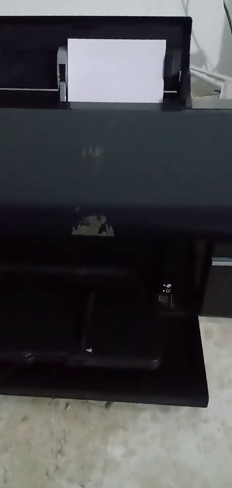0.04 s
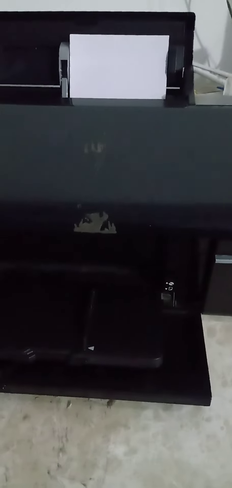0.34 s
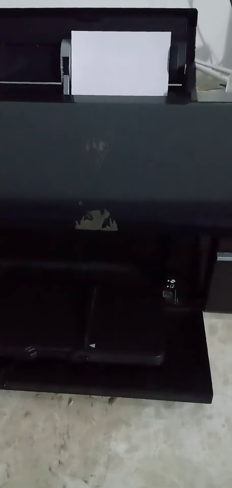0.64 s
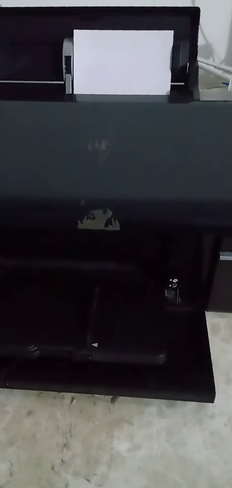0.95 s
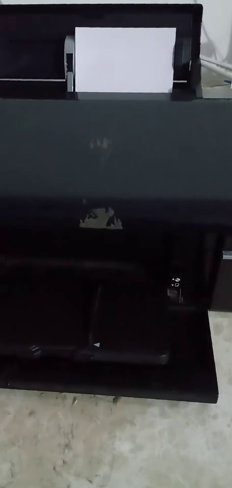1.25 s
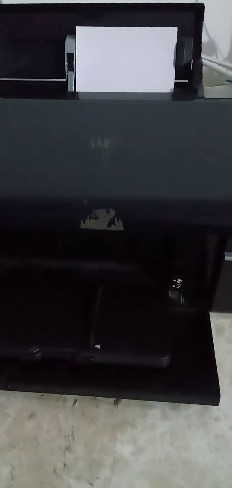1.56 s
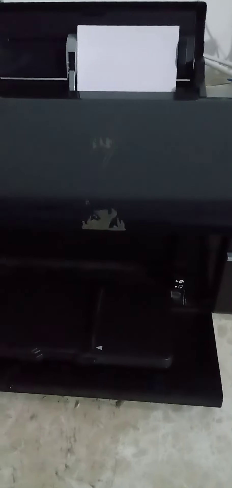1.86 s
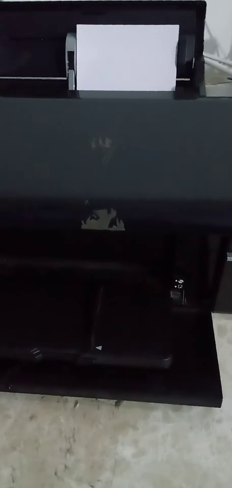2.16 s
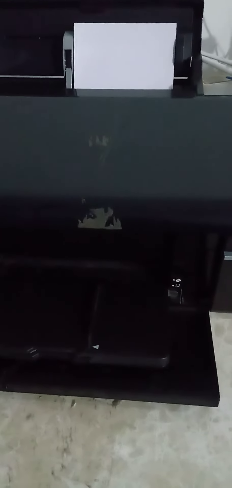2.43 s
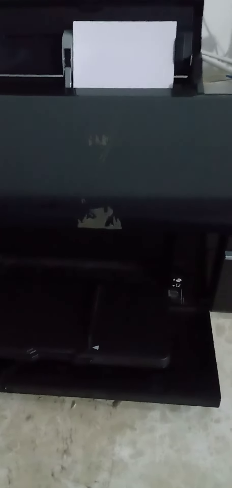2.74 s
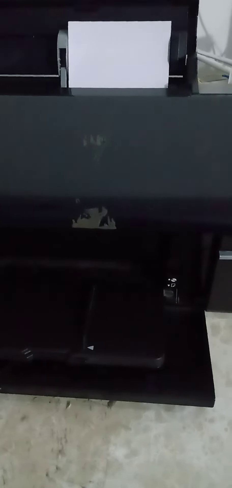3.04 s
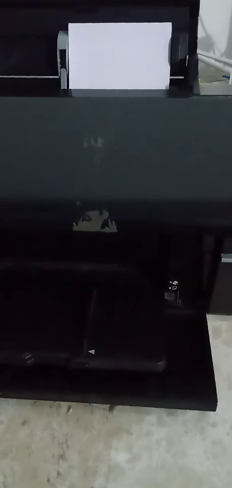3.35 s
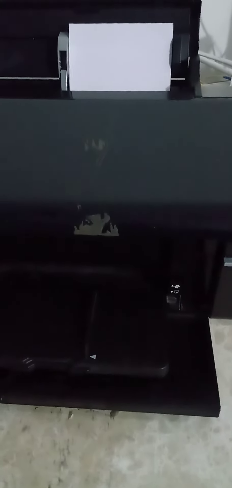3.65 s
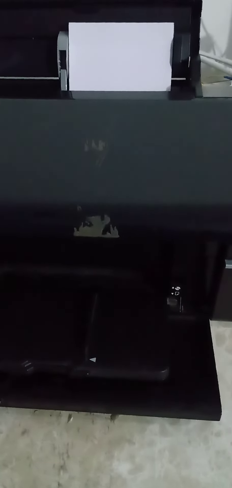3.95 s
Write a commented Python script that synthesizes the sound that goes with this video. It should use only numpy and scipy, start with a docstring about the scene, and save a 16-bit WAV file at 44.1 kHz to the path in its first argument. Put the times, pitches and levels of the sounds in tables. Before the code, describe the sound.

An inkjet printer clicks, clunks and whirs as it draws in a sheet of card.

```python
"""An inkjet printer takes in a sheet of card in a bare, ringing room, over its idle hum.
First the drive takes up its slack with a clack; the carriage makes a short run and parks (0.7-1.3 s).
Latches drop in and a ratchet rasps; each impact sets the plastic case ringing. From 2.3 s the rollers
creep. At 3 s the feed gears engage: tooth contacts force the case to whir, the motor whines and the
card hisses by friction as it is drawn in amid clicks and knocks. Last, a roller squeals as it stops."""
import sys
import numpy as np
from scipy import signal
from scipy.fft import rfft, irfft
from scipy.io import wavfile
from scipy.ndimage import uniform_filter1d

SR = 44100
rng = np.random.default_rng(int(sys.argv[2]) if len(sys.argv) > 2 else 0)


def inscribe(sig):
    """Save sig as 16-bit PCM at rate SR to the path in sys.argv[1].

    A 1-D sig is mono; a 2-D sig holds one channel per row.
    Samples are clipped to [-1, 1] before scaling.
    """
    pcm = np.round(np.clip(np.atleast_2d(sig).T, -1, 1) * 32767)
    wavfile.write(sys.argv[1], SR, pcm.astype(np.int16))


N = 176400
T = np.arange(N) / SR

# effort of each drive (time [s], level [dB])
CARRIAGE_EFFORT = [(.743, -77.5), (.748, -54.5), (.9, -52.5), (1.0, -53), (1.1, -51.5), (1.18, -49),
                   (1.21, -56), (1.3, -76)]
RATCHET_EFFORT = [(1.525, -83), (1.55, -44.5), (1.6, -51.5), (1.66, -54.5), (1.70, -62.5), (1.9, -78.5)]
CREEP_EFFORT = [(2.3, -92), (2.37, -77.5), (2.6, -72), (2.62, -66), (2.71, -65), (2.78, -59.5), (2.86, -60),
                (3.0, -69.5), (3.05, -76)]
FEED_EFFORT = [(3.0, -63), (3.03, -46), (3.072, -58.5), (3.09, -38), (3.15, -44.5), (3.22, -41.5),
               (3.3, -46), (3.4, -50), (3.55, -50), (3.61, -46.5), (3.66, -47.5), (3.73, -51),
               (3.76, -40.5), (3.81, -43.5), (3.88, -42.5), (3.95, -48), (4.0, -53)]
# spectrum of each drive (frequency [Hz], level [dB])
CARRIAGE_SPECTRUM = [(60, -17), (125, -7.5), (189, -11), (227, -3), (465, 1), (582, -3.5), (971, -7),
                     (1690, -12.5), (2340, -10), (8000, -27.5), (10400, -73)]
RATCHET_SPECTRUM = [(145, -24), (231, 0.5), (388, -4), (998, -5), (1310, -6.5), (3920, -10), (8000, -27),
                    (10400, -68)]
CREEP_SPECTRUM = [(50, -20), (139, 1.5), (203, -10.5), (256, 0), (475, -15.5), (528, -2.5), (575, -7),
                  (1560, -22), (6890, -39.5), (8000, -32.5), (10400, -66)]
FEED_SPECTRUM = [(50, -22.5), (212, -4.5), (446, -10), (639, -5), (1090, -13.5), (1260, -8), (1370, -15),
                 (2600, -15), (7040, -32.5), (8000, -41), (10400, -72)]
def drives():
    """Transmission noise: the carriage belt runs more evenly than the ratchet, rollers and feed gears."""
    return (meshing(CARRIAGE_EFFORT, CARRIAGE_SPECTRUM, spread_db=1, flutter_db=1)
            + meshing(RATCHET_EFFORT, RATCHET_SPECTRUM)
            + meshing(CREEP_EFFORT, CREEP_SPECTRUM)
            + meshing(FEED_EFFORT, FEED_SPECTRUM))

def meshing(effort, spectrum, spread_db=1.5, flutter_db=2, teeth_per_s=520):
    """Forced vibration: uneven tooth contacts and sliding friction shake the case."""
    count = np.floor(np.cumsum(teeth_per_s * (1 + .08 * drift(60))) / SR)
    strength = from_db(spread_db * np.clip(rng.standard_normal(N), -2, 2))
    teeth = np.diff(count, prepend=0) * strength * rng.choice([-1, 1], N)
    friction = .88 * rng.standard_normal(N)
    envelope = level(effort) * from_db(flutter_db * drift(50))
    return envelope * in_case(unit_power(teeth) + friction, at_hz(spectrum, bins(N)))

# pawls and gears snap (time [s], level [dB], tilt [dB/octave], T60 [s])
SNAPS = [(.207, -63, -5.5, 0.077), (.746, -55.5, 0, .05), (.883, -47.5, -1, 0.052),
         (.953, -47, -1.5, 0.066), (1.13, -53, 0.5, .12), (1.181, -46.5, -1, .07), (1.540, -41, 4.5, .08),
         (1.661, -45, -1, 0.065), (2.613, -62.5, -7, .08), (2.7694, -58.5, -4.5, 0.028),
         (2.905, -61.5, 4, .03), (3.021, -51, 0.5, .05), (3.040, -42.5, 2, .07), (3.097, -38.5, 2.5, .08),
         (3.170, -38, -1, .07), (3.187, -31.5, 0.5, .09), (3.201, -36.5, 4.5, .1), (3.624, -57, 4, .05),
         (3.652, -36, 1, 0.037), (3.750, -37.5, 0, .08), (3.833, -43, 4, .06), (3.850, -35, 2.5, .09),
         (3.879, -38, -0.5, .08), (3.887, -37.5, 2, .06), (3.924, -38.5, -1.5, .07),
         (3.967, -40, -1.5, .05)]
# sprung latches drop in (time [s], crack level [dB], tilt [dB/octave], crack T60 [s], ring level [dB])
LATCH_DROPS = [(1.384, -48.5, -3, .09, -45.5), (1.526, -38, 1.5, .08, -37.5),
               (3.006, -38.5, -1, 0.063, -40), (3.076, -37.5, -.5, 0.058, -30.5),
               (3.736, -31, 0, 0.06, -28)]
# a hard plastic contact before its tilt (frequency [Hz], level [dB])
CLICK_SPECTRUM = [(100, -21), (400, -5), (900, -0.5), (1600, -5), (2600, -2), (3300, -5), (4200, -6),
                  (6000, -9.5), (8000, -18.5)]
def clicks(after_t60=.28):
    """Impulse excitation: a brief contact gives a broadband crack and a weak after-ring of the case."""
    out, hz = np.zeros(N), bins(SR)
    after_ring = from_db(-18 - 60 * T[:SR] / after_t60)
    for start, db, tilt, t60, *_ in SNAPS + LATCH_DROPS:
        ring = dense_modes(at_hz(CLICK_SPECTRUM, hz) + tilt * np.log2(np.maximum(hz, 300)))
        add(out, start, from_db(db) * ring * (decay(t60) + after_ring))
    return out

# modes of a latch spring (frequency [Hz], level [dB])
SPRING_MODES = [(2400, -6), (2615, 0), (2790, -7), (4090, -12), (4440, -11)]
def latch_rings(attack_s=.0013, t60=.06, detune=.004):
    """Free vibration: each latch rings briefly at the natural frequencies of its spring."""
    out, t = np.zeros(N), T[:SR]
    envelope = np.minimum(t / attack_s, 1) * from_db(-60 * t / t60)
    for start, *_, ring_db in LATCH_DROPS:
        ring = sum(from_db(db) * mode(hz * rng.normal(1, detune)) for hz, db in SPRING_MODES)
        add(out, start, from_db(ring_db) * unit_power(ring) * envelope)
    return out

# the chassis takes a load (time [s], level [dB], centre frequency [Hz], T60 [s])
CHASSIS_LOADS = [(.210, -54, 235.5, 0.24), (.436, -49, 498, 0.13), (.449, -46.5, 238, 0.15),
                 (.99, -47.5, 283, 0.18), (1.196, -42, 656, 0.083), (1.206, -48, 145, 0.25),
                 (1.527, -41, 591, 0.18), (1.538, -44, 341, 0.14), (1.664, -53.5, 447, 0.1),
                 (2.105, -66, 156.5, 0.22), (2.611, -57.5, 755, 0.16), (2.727, -59, 221, 0.24),
                 (2.769, -50.5, 652, 0.065), (3.008, -52, 644, 0.07), (3.032, -48, 280, 0.094),
                 (3.082, -41.5, 380, 0.1), (3.165, -38, 301, 0.15), (3.19, -37.5, 250, .2),
                 (3.586, -45, 330, 0.21), (3.655, -46.5, 328, 0.14), (3.745, -37.5, 328, 0.23),
                 (3.75, -47, 149.6, 0.22), (3.833, -45, 298, 0.13), (3.85, -36, 230, 0.11),
                 (3.8914, -31.5, 604, 0.048)]
def knocks(width_octaves=.55, skirt_db=-20.5):
    """Modal response: a soft, heavy contact excites one panel mode and the low chassis modes around it."""
    out = np.zeros(N)
    for start, db, centre_hz, t60 in CHASSIS_LOADS:
        octaves = np.log2(bins(SR) / centre_hz)
        band = np.exp(-.5 * (octaves / width_octaves) ** 2) + from_db(skirt_db) / (1 + octaves ** 2)
        ring = dense_modes(20 * np.log10(band)) + from_db(-6) * mode(centre_hz)
        add(out, start, from_db(db) * unit_power(ring) * decay(t60, attack_s=.0044))
    return out

# the hollow clack (frequency [Hz], level [dB])
CLACK_SPECTRUM = [(200, -24), (700, -12), (1300, 2), (1750, 0), (2300, 2), (2750, -6.5), (3200, -12),
                  (5500, -21), (7200, -18.5), (8200, -35)]
def clack(start=.4275):
    """Backlash: the drive takes up its slack in one impact."""
    out = np.zeros(N)
    ring = dense_modes(at_hz(CLACK_SPECTRUM, bins(SR)))
    add(out, start, from_db(-41) * ring * decay(t60=.1))
    return out

# the feed motor's whine (time [s], level [dB])
MOTOR_LEVEL = [(3.07, -90), (3.09, -55), (3.27, -51.5), (3.46, -50), (3.5, -54.5), (3.6, -46.5),
               (3.614, -60), (3.75, -73)]
# its harmonics (order, level [dB], throb depth [dB])
HARMONICS = [(1, -1.5, 0), (2, -.5, 2), (4, -16, 3), (7, -18.5, 6)]
def motor(hz=635.3, turns_per_s=6.2, peak_s=3.56):
    """Amplitude modulation: at a steady speed, the overtones throb as the load peaks once a roller turn."""
    load = np.cos(2 * np.pi * turns_per_s * (T - peak_s))
    return level(MOTOR_LEVEL) * sum(from_db(db + throb * load) * tone(k * hz) for k, db, throb in HARMONICS)

# gears and rollers under load, and the feed motor's swell near 610 Hz as it stops (start [s], end [s],
# frequency [Hz], level [dB])
GEAR_TONES = [(3.49, 3.66, 1809, -57.5), (3.51, 3.65, 1900, -61.5), (3.48, 3.58, 2540, -60),
              (3.6, 3.67, 610, -52), (3.617, 3.628, 4050, -58), (.76, 1.18, 2390, -63.5),
              (.77, 1.17, 955, -66)]
def gear_whines(attack_s=.012, t60=.22):
    """Driven oscillation: each part sings while loaded, then decays exponentially."""
    out = np.zeros(N)
    for start, end, hz, db in GEAR_TONES:
        gate = np.clip((T - start) / attack_s, 0, 1) * from_db(-60 * np.maximum(T - end, 0) / t60)
        out += gate * from_db(db) * tone(hz, wobble=.01, flutter_db=3.5)
    return out

# a stopping roller (time [s], frequency [Hz], level [dB])
ROLLER_GLIDE = [(3.79, 850, -62), (3.83, 843, -46.5), (3.925, 846, -50), (3.942, 845, -40.5),
                (3.958, 820, -39), (3.968, 780, -53), (4.0, 780, -66)]
def roller_squeal():
    """Frequency glide: the squeal droops as the roller stops."""
    times, hz, db = np.transpose(ROLLER_GLIDE)
    return level(np.c_[times, db]) * tone(np.interp(T, times, hz))

# the sliding card (time [s], level [dB]) and its spectrum (frequency [Hz], level [dB])
CARD_LEVEL = [(2.6, -86), (2.8, -70.5), (3.0, -73), (3.1, -59.5), (3.25, -53), (3.4, -62), (3.72, -72),
              (3.76, -55), (3.82, -62), (3.88, -48.5), (4.0, -60.5)]
CARD_SPECTRUM = [(500, -23.5), (2000, 1.5), (3500, -0.5), (5000, -2), (7000, 6), (8200, -13)]
def card_slide():
    """Friction noise: the card hisses over the rollers."""
    return level(CARD_LEVEL) * case_noise(CARD_SPECTRUM)

# resonances of the plastic case (frequency [Hz], bandwidth [Hz], lift [dB])
CASE_MODES = [(156, 15, 5), (223, 18, 5), (274.5, 22, 6), (383, 51, 3), (538, 18, 3.5), (783, 17, 1.5),
              (997, 24, 4.5), (1916, 66, 4), (2320, 120, 2.5), (4010, 84, 3.5)]
def in_case(x, spectrum_db):
    """Resonance: a vibration is coloured, lifted at each case mode and scaled to unit power."""
    hz = bins(len(x))
    lift = sum(db / (1 + (2 * (hz - centre) / width) ** 2) for centre, width, db in CASE_MODES)
    return unit_power(irfft(rfft(x) * from_db(spectrum_db + lift), len(x)))

# reverberation relative to the direct sound (frequency [Hz], level [dB])
ROOM_SPECTRUM = [(100, -6.5), (400, -6), (1000, -4.5), (2500, -4.5), (5000, -7), (8000, -12)]
def room(x, t60=.82, treble_t60=.65, split_hz=7200, gap_s=.0086, build_s=.015):
    """Diffuse reverberation: hard walls return a dense tail whose treble dies sooner."""
    t, hz = T[:SR], bins(SR)
    noise = rfft(rng.standard_normal(SR))
    low_share = 1 / (1 + (hz / split_hz) ** 6)
    low = irfft(noise * low_share) * from_db(-60 * t / t60)
    treble = irfft(noise * (1 - low_share)) * from_db(-60 * t / treble_t60)
    tail = rfft(np.clip((t - gap_s) / build_s, 0, 1) * (low + treble))
    even = tail / np.sqrt(uniform_filter1d(np.abs(tail) ** 2, size=20))  # no pitch stands out
    fade = np.cos(np.pi / 2 * t ** 2) ** 2
    response = irfft(even * from_db(at_hz(ROOM_SPECTRUM, hz))) * fade
    return signal.fftconvolve(x, response)[:N]

# idle hum and room noise (time [s], level [dB]) and their spectrum (frequency [Hz], level [dB])
IDLE_LEVEL = [(0, -68.5), (.4, -68.5), (1.5, -62.5), (2.3, -72.5), (4, -73.5)]
IDLE_SPECTRUM = [(45, -9), (110, 5), (230, -1), (550, -6), (800, -6.5), (1400, -14.5), (3800, -20),
                 (7500, -30.5)]
def idle_hum():
    """Noise floor: a low hum coloured by the case resonances."""
    return level(IDLE_LEVEL) * case_noise(IDLE_SPECTRUM)

def case_noise(spectrum):
    """Source and filter: white noise shaped by a spectrum and the case."""
    return in_case(rng.standard_normal(N), at_hz(spectrum, bins(N)))

def dense_modes(spectrum_db):
    """Modal overlap: crowded case modes merge into one second of level noise."""
    ring = in_case(rng.standard_normal(SR), spectrum_db)
    return ring / np.sqrt(uniform_filter1d(ring ** 2, size=600))

def decay(t60, attack_s=.0013):
    """Damping: a linear rise, then a fall of 60 dB every t60 seconds."""
    t = T[:SR]
    return np.minimum(t / attack_s, 1) * from_db(-60 * np.maximum(t - attack_s, 0) / t60)

def mode(hz):
    """Simple harmonic motion: one second at unit power and random phase."""
    return np.sqrt(2) * np.sin(2 * np.pi * (hz * T[:SR] + rng.random()))

def tone(hz, wobble=.003, flutter_db=2):
    """Random modulation: a sine wavers in pitch and level."""
    phase = 2 * np.pi * np.cumsum(hz * (1 + wobble * drift(150))) / SR
    return np.sqrt(2) * from_db(flutter_db * drift(35.24)) * np.sin(phase)

def drift(per_s):
    """Slow fluctuation: straight lines between Gaussian values."""
    return np.interp(T * per_s, np.arange(2000), rng.standard_normal(2000))

def level(curve):
    """Gain along a (time [s], level [dB]) curve, silent outside it."""
    times, db = np.transpose(curve)
    return from_db(np.interp(T, times, db, left=-200, right=-200))

def at_hz(spectrum, hz):
    """Level [dB] of a spectrum, falling 12 dB an octave below its first point."""
    points_hz, db = np.transpose(spectrum)
    return np.interp(np.log(hz), np.log(points_hz), db) + 12 * np.minimum(np.log2(hz / points_hz[0]), 0)

def bins(size):
    """Fourier frequencies, at least 1 Hz."""
    return np.maximum(np.fft.rfftfreq(size, 1 / SR), 1)

def from_db(db):
    """Decibels to gain."""
    return 10 ** (np.asarray(db) / 20)

def unit_power(x):
    """Scale to a mean square of one."""
    return x / np.sqrt(np.mean(x ** 2) + 1e-20)

def add(out, start, sound):
    """Superpose a sound at its start [s]."""
    i = max(int(start * SR), 0)
    out[i:i + len(sound)] += sound[:N - i]

def scene():
    """Superposition: the mechanism and its reverberation, plus dry tones and hum."""
    printer = drives() + clicks() + clack() + knocks() + card_slide()
    rings = latch_rings()
    reverberation = room(printer + from_db(-13) * rings)
    tones = motor() + gear_whines() + roller_squeal()
    return (printer + rings + reverberation + tones + idle_hum())[None]

def record(dry):
    """Band limiting: the deep bass is thinned and the top is cut steeply."""
    thin = signal.sosfilt(signal.butter(2, 48, "high", fs=SR, output="sos"), dry)
    return signal.sosfilt(signal.cheby2(20, 70, 8650, fs=SR, output="sos"), thin)

dry = scene()
out = record(dry)
inscribe(out)
```